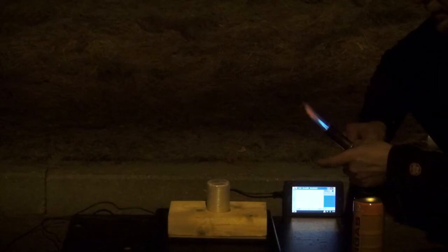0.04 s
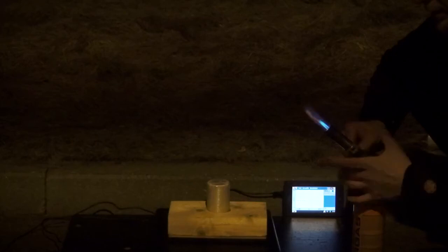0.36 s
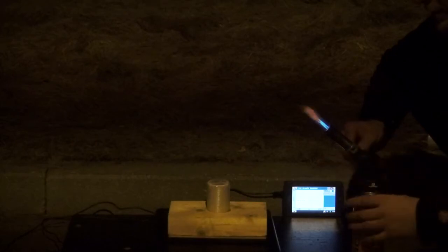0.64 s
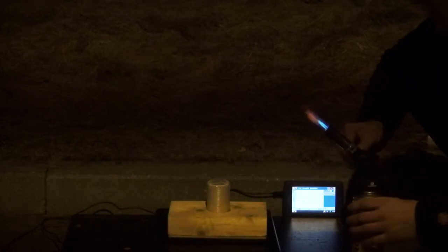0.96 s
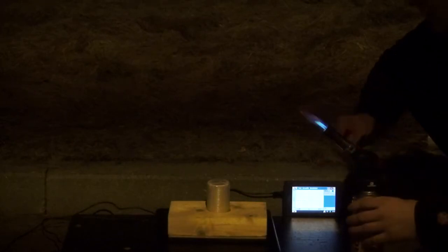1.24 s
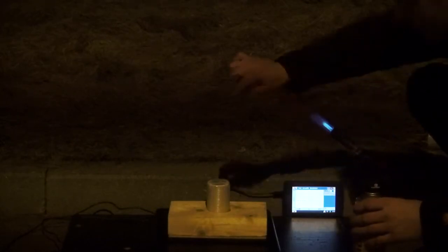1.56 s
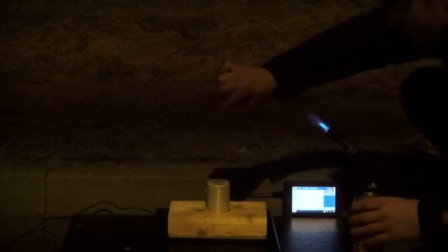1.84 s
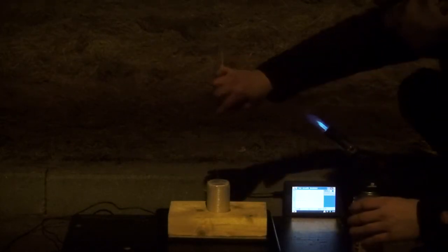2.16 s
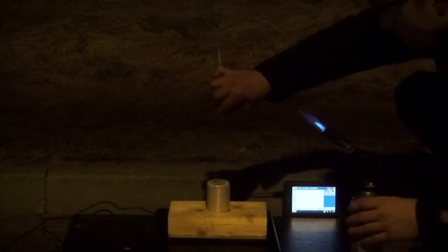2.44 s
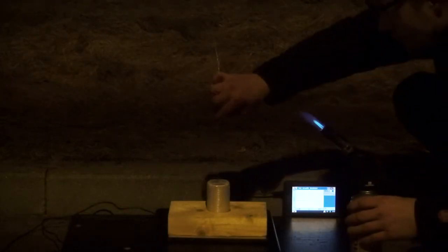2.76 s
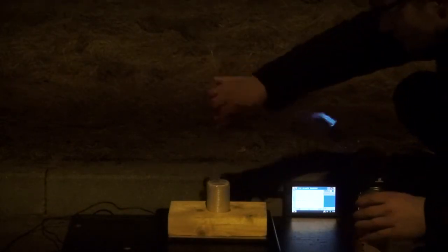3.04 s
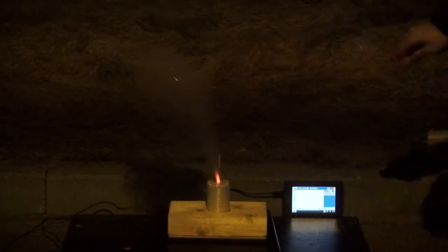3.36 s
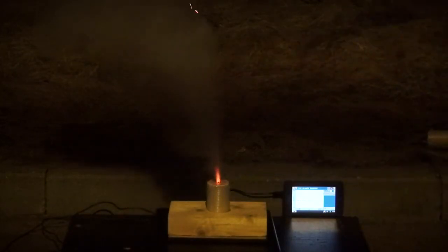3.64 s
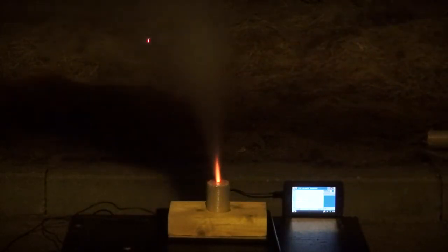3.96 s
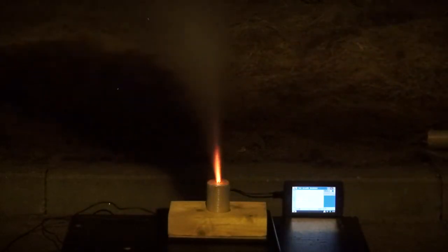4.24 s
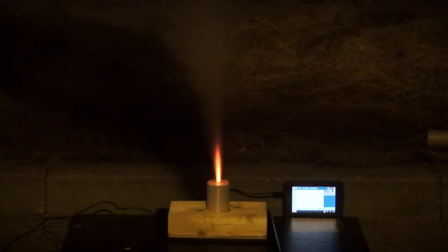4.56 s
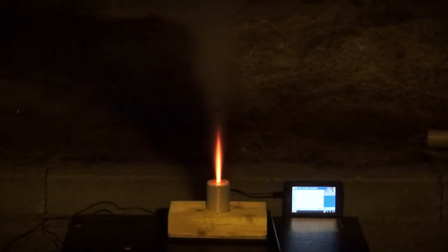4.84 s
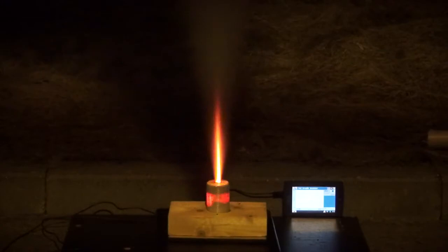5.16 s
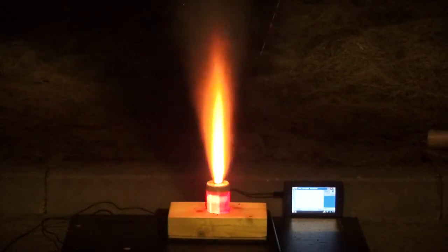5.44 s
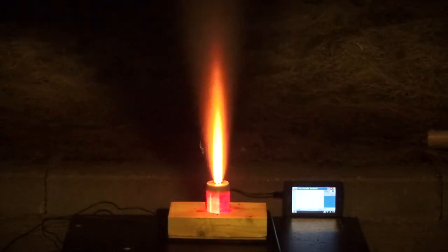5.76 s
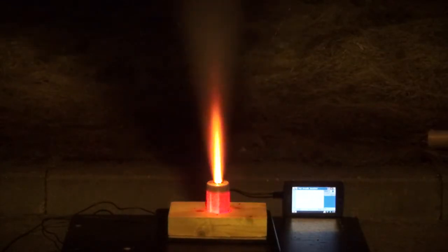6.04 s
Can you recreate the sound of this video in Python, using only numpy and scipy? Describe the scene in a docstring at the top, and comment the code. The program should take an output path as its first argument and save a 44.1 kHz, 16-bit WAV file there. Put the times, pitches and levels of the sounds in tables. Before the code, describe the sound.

A gas torch roars softly, close by in quiet open air, for the first three seconds. Its flame gives a few tiny spits, and light ticks around 1 and 2.5 seconds, while sleeves brush faintly. At about 3 seconds the torch fades and a small solid rocket motor catches with a thin fizz, a high rising whistle and a hollow rising note. Sharp spark cracks and fine crackling follow around 3.3 seconds. The sound swells into a loud hissing jet by 4 seconds, with a rough, throaty burn and scattered pops, the strongest near 4.2 seconds. At about 5 seconds the throaty tone drops out and the jet briefly thins. At 5.3 seconds the plume bursts into flame with a whoosh, a low fluttering roar and more pops. The hiss is loudest here, easing slightly but still running at the end, near 6 seconds.

```python
"""A gas torch roars softly in the night air, spitting and ticking, while sleeves brush beside it.
A small solid rocket motor catches with a thin fizz, its whistle rising as the gas in the casing heats.
The propellant crackles, and turbulent mixing swells into a hissing jet, while rough combustion drives
the resonances of casing and nozzle in a throaty, popping burn. The jet thins for a moment,
then the plume bursts into a tall, fluttering flame."""
import sys
import numpy as np
from scipy import signal
from scipy.fft import rfft, irfft
from scipy.io import wavfile
from scipy.ndimage import uniform_filter1d

SR = 44100
rng = np.random.default_rng(int(sys.argv[2]) if len(sys.argv) > 2 else 0)


def bounce(signal):
    """Save signal as a 16-bit WAV file at the path given by the first command-line argument."""
    frames = np.transpose(np.atleast_2d(signal))
    limited = np.clip(frames, -1, 1)
    pcm = np.round(limited * 32767).astype(np.int16)
    wavfile.write(sys.argv[1], SR, pcm)


N = 268569
TIME = np.arange(N) / SR
BINS = np.fft.rfftfreq(1024, 1 / SR)  # Hz
FRAMES = np.arange(N // 256 + 5)[:, None] * 256 / SR  # seconds

# Stages of the burn: the first fizz, the propellant alight, the jet thins, the plume catches fire.
CATCH_S, LIGHT_S, THIN_S, FLARE_S = 2.979, 3.123, 4.97, 5.268
# Spectrum of a tick, crackle or spark. Each row: frequency in Hz, relative density in dB.
SNAP_SPECTRUM = [(200, 1), (900, -1.5), (2200, 3.5), (4000, -6), (6500, -12), (9000, -24), (16000, -14)]
# Stereo width of the motor. Each row: frequency in Hz, side level against the middle in dB.
MOTOR_WIDTH = [(60, -12), (200, -19), (400, -31), (800, -25), (1400, -89), (3000, -75), (4500, -89),
               (9000, -43), (15000, -40)]


def amp(db):
    """Amplitude grows tenfold for every 20 dB."""
    return 10 ** (np.asarray(db) / 20)


def unit(x):
    """Normalisation to rms 1."""
    return x / np.sqrt(np.mean(x ** 2) + 1e-20)


def curve(points, hz):
    """Interpolation of a spectrum on a log-frequency axis."""
    f, value = np.transpose(points)
    return np.interp(np.log(hz + 1), np.log(f + 1), value)


def add(mix, s, sound):
    """Superposition: a sound joins the mix at time s."""
    part = mix[round(s * SR):][:len(sound)]
    part += sound[:len(part)]


def passed(s, over_s):
    """A smooth transition from 0 to 1 around time s."""
    return .5 + .5 * np.tanh(2 * (TIME - s) / over_s)


def settling(s, tau_s):
    """Exponential relaxation from 1 to 0, beginning at time s."""
    return np.exp(-np.maximum(TIME - s, 0) / tau_s)


def swell(s, rise_s, depth_db, hold_s, fall_db_per_s):
    """An envelope that rises from depth_db down at time s and decays exponentially after s + hold_s."""
    fall_db = fall_db_per_s * np.maximum(TIME - s - hold_s, 0)
    return amp(-depth_db * settling(s, rise_s) - fall_db) * (TIME >= s)


def framed(control):
    """Sampling of a control, once for each frame of noise."""
    return np.interp(FRAMES, TIME, control)


def wander(rate_hz):
    """Random fluctuation of rms 1: noise low-passed at the given rate."""
    hz = np.fft.rfftfreq(N, 1 / SR)
    return unit(irfft(rfft(rng.standard_normal(N)) / (1 + (hz / rate_hz) ** 4), N))


def resonances(modes, hz):
    """Resonances add in power. Each mode: centre in Hz, width in Hz, level in dB."""
    return np.sqrt(sum((amp(db) / (1 + 2 * ((hz - f) / width) ** 2)) ** 2 for f, width, db in modes))


def pipe(echo):
    """Standing waves in the casing: sound keeps the share `echo` on each round trip."""
    spacing_hz = 2410
    return 1 / abs(1 - np.clip(echo, 0, .8) * np.exp(2j * np.pi * BINS / spacing_hz))


def turbulence(colour, width, patchy_db, band=slice(None)):
    """Eddies modulate coloured stereo noise in time and frequency; the given band has rms near 1."""
    mid_re, mid_im, side_re, side_im, eddies = rng.standard_normal((5, len(FRAMES), len(BINS)))
    eddies = unit(uniform_filter1d(uniform_filter1d(eddies, size=4, axis=0), size=12, axis=1))
    eddies *= curve([(500, 0.69), (3000, 0.93), (8000, 0.7)], BINS)  # many small eddies average out
    colour = colour / np.sqrt(np.sum(colour[..., band] ** 2, axis=-1, keepdims=True))
    mid = mid_re + 1j * mid_im
    side = amp(curve(width, BINS)) * (side_re + 1j * side_im)
    spectra = np.array([mid + side, mid - side]) * colour * amp(patchy_db * eddies)
    _, noise = signal.istft(spectra, nperseg=1024, noverlap=768, time_axis=1, freq_axis=2)
    return np.sqrt(3 / 2) * noise[:, :N]


def burst(length_s, spectrum):
    """Spectral shaping of white noise gives a short coloured burst of rms 1."""
    colour = amp(curve(spectrum, np.fft.rfftfreq(SR, 1 / SR)))
    noise = irfft(rfft(rng.standard_normal(SR)) * colour)
    return unit(noise[:round(length_s * SR)])


def snaps(rows):
    """Broadband transients with exponential decay, one for each row."""
    out, t = np.zeros(N), np.arange(SR // 8) / SR
    for s, db, t60 in rows:
        crack = burst(len(t) / SR, SNAP_SPECTRUM) * np.exp(-np.log(1000) * t / t60)
        add(out, s, amp(db) * crack / abs(crack).max())
    return out


def torch():
    """Flame noise, coloured by the torch's tube, sinks to the level of the night air as it draws away."""
    # Torch over night air. Each row: frequency in Hz, relative density in dB.
    spectrum = [(15, -33), (25, -4), (157, -1), (189, -3.5), (222, 0.5), (342, -2.5), (473, -15),
                (929, -12.5), (1120, -15.5), (2200, -30), (2520, -30.5), (3050, -30.5), (3990, -34),
                (5370, -36.5), (15800, -41.5)]
    # Peaks and dips of the tube. Each row: centre in Hz, width in Hz, gain in dB.
    tube = [(300, 180, -1.5), (560, 200, -0.5), (1030, 560, 2.5), (1570, 460, -1.5), (2180, 390, 4),
            (2660, 280, -5), (3220, 400, 3), (4800, 360, -6)]
    # Each row: frequency in Hz, side level against the middle in dB.
    stereo_width = [(60, -25), (300, -14.5), (700, -13.5), (3000, -27), (6000, -3), (15000, -6)]
    on_s, away_s, torch_db, night_db, fade_db_per_s = 0.081, 3.06, -46, -56.5, 16
    tube_db = sum(db * np.exp(-(2 * (BINS - hz) / width) ** 2) for hz, width, db in tube)
    roar = turbulence(amp(curve(spectrum, BINS) + tube_db), stereo_width, patchy_db=2.0)
    level_db = np.maximum(torch_db - fade_db_per_s * np.maximum(TIME - away_s, 0), night_db)
    flutter_db = .8 * wander(rate_hz=12)
    lean_left = amp([[.8], [-.8]])
    return roar * passed(on_s, over_s=0.009) * amp(level_db + flutter_db) * lean_left


def spits():
    """Brief escapes of gas from the torch make high-pitched flow noise."""
    # Each row: start in seconds, length in seconds, level in dB.
    escapes = [(0.249, 0.031, -54.5), (1.256, 0.034, -61), (2.525, .014, -65)]
    # Each row: frequency in Hz, relative density in dB.
    spectrum = [(2000, -25), (4100, -6), (4600, 2), (5100, -13), (8800, -10), (10300, 0), (11300, -8),
                (12500, -7), (14000, -16), (15500, -20)]
    out = np.zeros(N)
    for s, length_s, db in escapes:
        gas = burst(length_s, spectrum)
        add(out, s, amp(db) * gas * signal.windows.tukey(len(gas), .5))
    return out


def sleeves():
    """Friction of cloth makes soft swells of broad noise as the arms move."""
    # Each row: start in seconds, length in seconds, level in dB, centre in Hz.
    brushes = [(0.356, 0.21, -67, 7500), (0.498, 0.15, -61, 7000), (0.697, 0.32, -63, 2200),
               (1.246, 0.6, -64.5, 6500), (2.58, 0.21, -67, 5000)]
    out = np.zeros(N)
    for s, length_s, db, hz in brushes:
        cloth = burst(length_s, [(hz / 5, -16), (hz, 0), (hz * 1.3, -2), (hz * 3, -16)])
        add(out, s, amp(db) * cloth * np.hanning(len(cloth)))
    return out


def ticks():
    """Small transients in the torch flame are heard as ticks."""
    # Each row: start in seconds, peak in dB, time to fall 60 dB in seconds.
    flame_ticks = [(.8424, -46, .015), (.8869, -42, .018), (.9344, -48, .015), (.9931, -42, .012),
                   (2.4074, -49, .012), (2.6544, -44, .012), (2.7701, -44, .015)]
    return snaps(flame_ticks)


def heated(cold_hz, hot_hz):
    """Sound travels faster in hot gas, so a resonance rises as the casing heats."""
    return framed(hot_hz + (cold_hz - hot_hz) * settling(CATCH_S, tau_s=0.31))


def ignition():
    """The first gas fizzes through the casing, exciting two rising resonances: whistle and hollow note."""
    # Each row: frequency in Hz, relative density in dB.
    fizz_spectrum = [(4000, -28), (6100, -10), (6900, -1), (8000, 1), (9600, -5), (10400, -6), (11200, 4),
                     (12600, 1), (13700, -15), (15500, -4)]
    fizz_db, whistle_db, hollow_db = -37.5, -36, -36
    unlit = framed(1 - passed(LIGHT_S, over_s=.05))
    top_db = unlit * curve([(12500, 0), (14000, -3)], BINS)  # the top opens once the propellant is alight
    fizz_colour = amp(curve(fizz_spectrum, BINS) + top_db) * pipe(echo=0.29)
    fizz = turbulence(fizz_colour, MOTOR_WIDTH, patchy_db=0.0)
    fizz *= amp(fizz_db) * swell(CATCH_S, rise_s=0.14, depth_db=20.5, hold_s=0, fall_db_per_s=0)
    whistle_modes = [(heated(cold_hz=9400, hot_hz=10500), 700, 0)]
    whistle = turbulence(resonances(whistle_modes, BINS), MOTOR_WIDTH, patchy_db=3.0)
    whistle *= amp(whistle_db) * swell(CATCH_S, rise_s=0.061, depth_db=15, hold_s=0.13, fall_db_per_s=26)
    chamber_modes = [(heated(cold_hz=625, hot_hz=1080), 170, 0), (155, 70, 0), (500, 130, -9)]
    hollow = turbulence(resonances(chamber_modes, BINS), MOTOR_WIDTH, patchy_db=3.0)
    hollow *= amp(hollow_db) * swell(CATCH_S, rise_s=0.12, depth_db=23.5, hold_s=0.3, fall_db_per_s=35)
    sputter_db = 0.3 * wander(rate_hz=55)
    return (fizz + whistle + hollow) * amp(sputter_db)


def crackle():
    """Grains of propellant snap independently as the flame spreads: a Poisson train of impulses."""
    per_second, spread_db, level_db, decay_s = 130, 4.5, -35, 0.00093
    fires = rng.random(N) < per_second / SR
    grains = fires * amp(spread_db * np.minimum(rng.exponential(1, N), 3))
    snap = burst(.004, SNAP_SPECTRUM)
    snap *= np.exp(-np.arange(len(snap)) / SR / decay_s)
    envelope = swell(LIGHT_S, rise_s=.2, depth_db=42, hold_s=0.37, fall_db_per_s=80)
    return unit(signal.oaconvolve(grains, snap)[:N]) * amp(level_db) * envelope


def jet():
    """Turbulent mixing noise of the exhaust grows with chamber pressure, thins, then flares and sags."""
    # Each row: frequency in Hz, relative density in dB.
    spectrum = [(35, -43), (60, -6), (180, -13), (221, -6), (329, -12), (446, -6), (837, -10), (897, -8.5),
                (1240, -7.5), (3240, -4.5), (4700, -4), (9460, -1), (14100, -8.5), (15800, -12)]
    base_db, sag_db_per_s = -21, 4
    filling_db = -44.5 * settling(LIGHT_S, tau_s=.27)
    surge_db = -3 * (1 - passed(3.73, over_s=0.067))  # the whole surface of the propellant catches
    pressure_db = filling_db + surge_db
    clogged = 1 - passed(4.2, over_s=0.44)  # body and echo fade as the nozzle clears
    flare = passed(FLARE_S, over_s=0.066)
    thin = passed(THIN_S, over_s=.08) - flare
    whoosh = np.exp(-((TIME - FLARE_S - 0.042) / 0.017) ** 2)  # the flame bursts out
    flare_db = flare * (5.3 - sag_db_per_s * (TIME - FLARE_S))
    level_db = base_db + pressure_db - 2.3 * thin + flare_db + 1.8 * whoosh

    tilt_db_per_octave = -2.6 + 5.1 * thin + 2.8 * flare
    treble_db = framed(tilt_db_per_octave) * np.log2(np.clip(BINS, 2000, None) / 5000)
    body_db = -9 + 9 * clogged + 10 * thin + 9.5 * flare - 0.47 * pressure_db + 4 * whoosh
    low_shelf_db = framed(body_db) / (1 + (BINS / 2000) ** 2)
    bass_cut_db = curve([(60, -13.0), (250, -6), (700, 1.0)], BINS)
    colour = amp(curve(spectrum, BINS) + treble_db + low_shelf_db + bass_cut_db)
    colour *= pipe(echo=.32 * framed(clogged))
    hiss = turbulence(colour, MOTOR_WIDTH, patchy_db=1.13, band=(BINS > 3500) & (BINS < 6500))
    flutter_db = 0.27 * wander(rate_hz=67)
    return hiss * amp(level_db + flutter_db) * passed(LIGHT_S, over_s=.07)


def burn():
    """Rough combustion drives the resonances of casing and nozzle until the jet thins."""
    # Each row: centre in Hz, width in Hz, relative level in dB.
    throat_modes = [(205, 79, -8), (480, 220, -2.5), (606, 97, 1), (1070, 150, -10), (1376, 260, 1.5),
                    (1830, 142, 6), (2260, 350, 1.5)]
    level_db = -21
    waver = framed(1 + 0.031 * wander(rate_hz=12.4))  # the unsteady flame shifts the resonances
    roar = turbulence(resonances(throat_modes, BINS * waver), MOTOR_WIDTH, patchy_db=0.2)
    envelope = swell(LIGHT_S, rise_s=0.41, depth_db=42, hold_s=1.295, fall_db_per_s=7.5)
    envelope *= 1 - passed(THIN_S, over_s=.05)
    chug_db = 1.73 * wander(rate_hz=120)
    return roar * envelope * amp(level_db + chug_db)


def sparks():
    """Sparks spat from the nozzle are impulsive sources, each a sharp crack."""
    # Each row: start in seconds, peak in dB, time to fall 60 dB in seconds.
    cracks = [(3.135, -42, .04), (3.165, -37, .04), (3.234, -33, .015), (3.2422, -24.5, 0.022),
              (3.3215, -21, 0.016), (3.339, -19, 0.02)]
    return snaps(cracks)


def pops():
    """Pockets of propellant flare: a damped oscillation knocks inside a broad puff of gas."""
    # Each row: start in seconds, peak in dB, pitch in Hz, time for the envelope to fall 60 dB in seconds.
    pockets = [(3.606, -14, 617, 0.065), (3.668, -14, 476, 0.033), (4.203, -10, 540, 0.043),
               (4.679, -22, 557, .03), (4.868, -16.5, 540, .025), (5.288, -19, 706, 0.18),
               (5.412, -12, 380, 0.052), (5.537, -17, 139, .06), (5.763, -16, 170, 0.025)]
    attack_s = 0.0041
    out, t = np.zeros(N), np.arange(SR // 8) / SR
    for s, db, hz, t60 in pockets:
        gas = burst(len(t) / SR, [(hz / 4, -15), (hz / 2, -6), (hz, 0), (hz * 2, -9), (hz * 4, -28)])
        knock = np.sin(2 * np.pi * hz * t) * np.exp(-t * hz / 2)
        envelope = (1 - np.exp(-t / attack_s)) * np.exp(-np.log(1000) * t / t60)
        pop = (knock + gas) * envelope
        add(out, s, amp(db) * pop / abs(pop).max())
    return out


def plume():
    """The exhaust catches fire in the air; turbulent combustion radiates a low roar that dies down."""
    # Each row: frequency in Hz, relative density in dB.
    spectrum = [(25, -40), (60, -22), (110, -3), (180, -3.5), (300, -5), (500, -9.5), (900, -14.5),
                (2000, -54), (6000, -56)]
    # Each row: frequency in Hz, side level against the middle in dB.
    stereo_width = [(60, -11), (200, -18), (400, -12), (800, -15), (1500, -24)]
    level_db = -24
    roar = turbulence(amp(curve(spectrum, BINS)), stereo_width, patchy_db=0.7)
    envelope = swell(FLARE_S, rise_s=0.011, depth_db=22, hold_s=.31, fall_db_per_s=37)
    flutter_db = 1.2 * wander(rate_hz=31)
    lean_left = amp([[.7], [-.7]])
    return roar * envelope * amp(level_db + flutter_db) * lean_left


def scene():
    """Torch and motor stand close by in open air, where their direct sounds superpose."""
    motor = ignition() + crackle() + sparks() + jet() + burn() + pops() + plume()
    return torch() + ticks() + spits() + sleeves() + motor


def record(dry):
    """Soft saturation rounds off the peaks of the flare; a low-pass filter then limits the band."""
    ceiling, cutoff_hz = .68, 15820
    rounded = dry / (1 + (dry / ceiling) ** 8) ** (1 / 8)
    lowpass = signal.firwin(511, cutoff_hz, window=("kaiser", 9), fs=SR)
    return signal.oaconvolve(rounded, lowpass[None], "same")


dry = scene()
out = record(dry)
bounce(out)
```